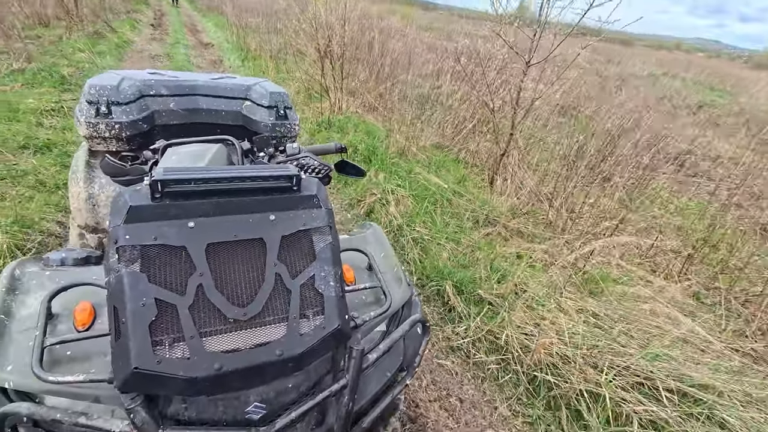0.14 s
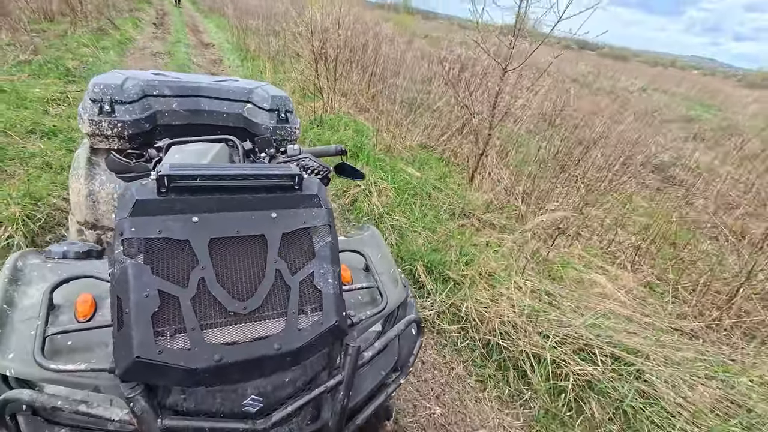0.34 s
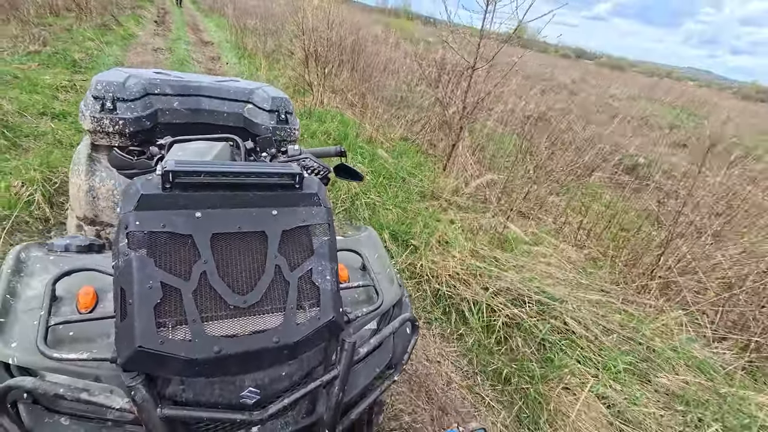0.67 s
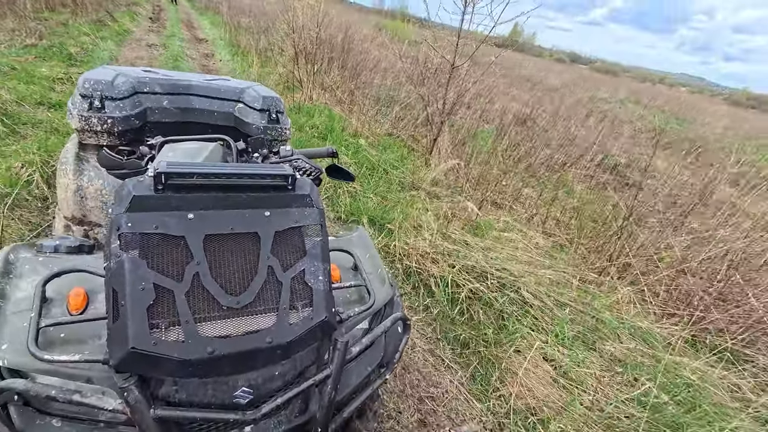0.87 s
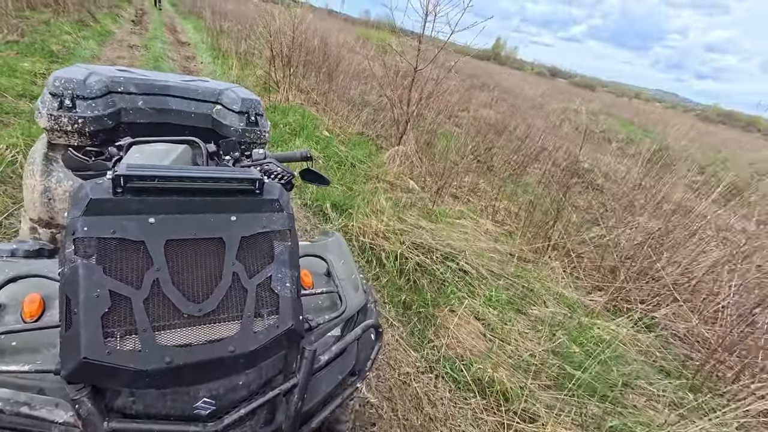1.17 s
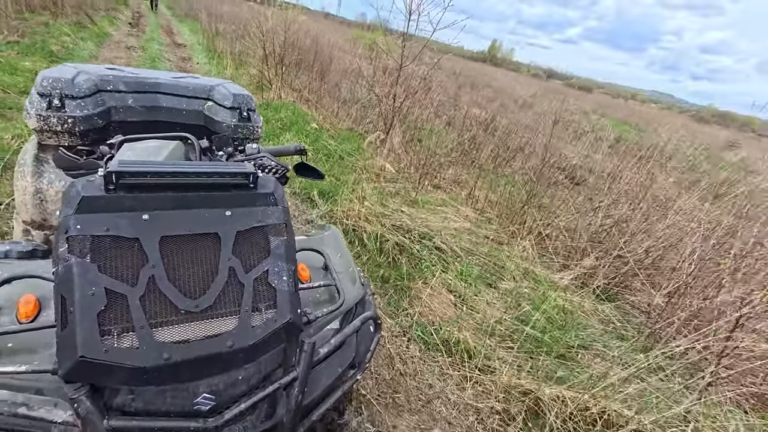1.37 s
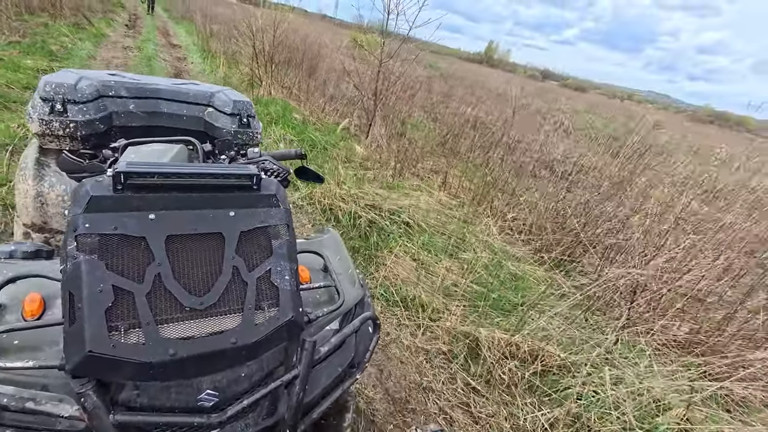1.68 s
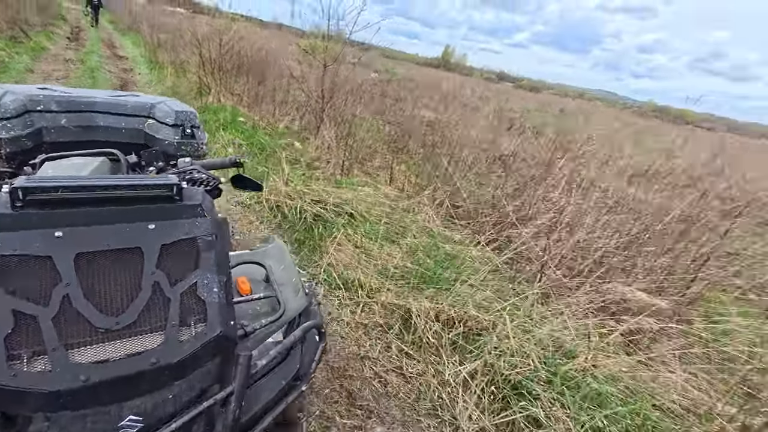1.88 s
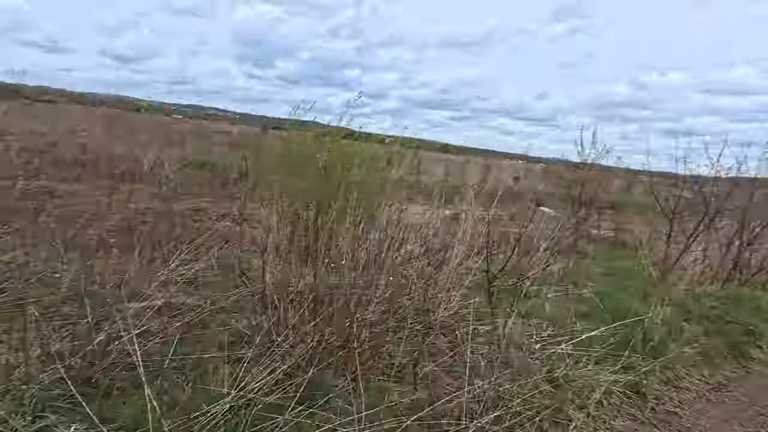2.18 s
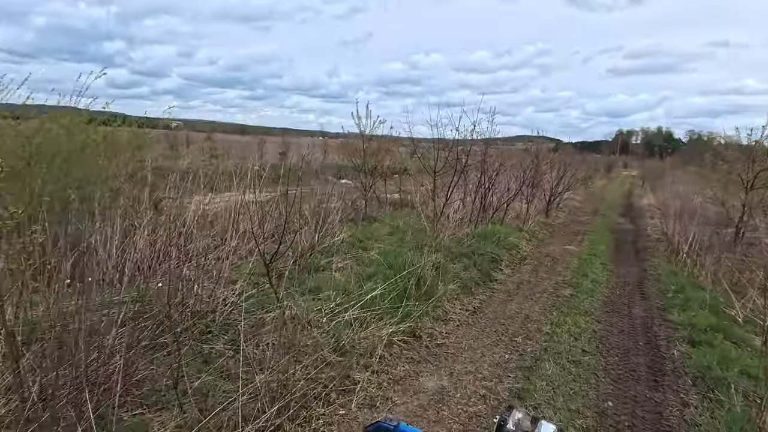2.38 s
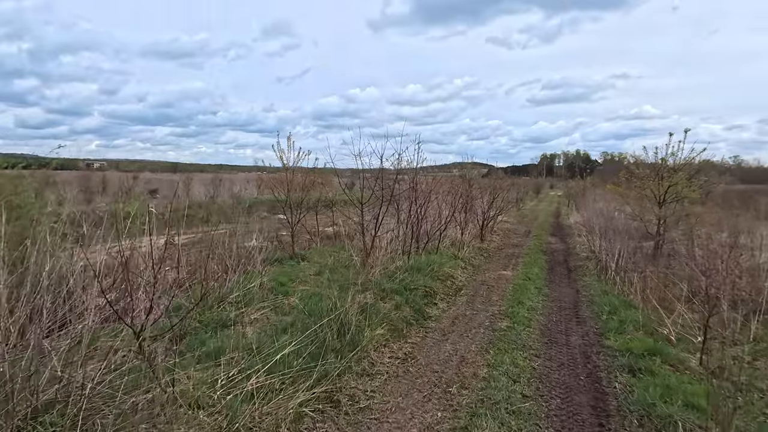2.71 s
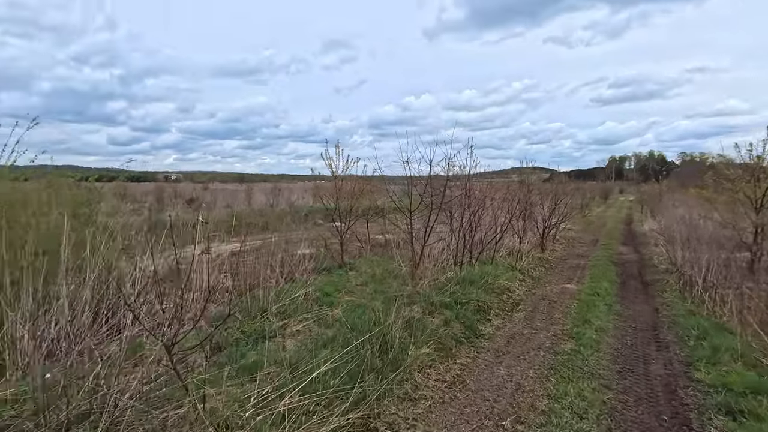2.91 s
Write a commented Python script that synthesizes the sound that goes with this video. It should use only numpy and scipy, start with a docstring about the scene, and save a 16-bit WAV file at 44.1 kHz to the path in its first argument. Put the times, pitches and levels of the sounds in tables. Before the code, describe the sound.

A quad bike engine drones loudly at a nearly steady low speed, with muffled clatter and soft jolts; after two seconds it picks up and turns raspier, with tyre swish. Outdoors, close microphone on the bike.

```python
"""Quad bike on a muddy track, from the saddle

A twin-cylinder quad rolls along at a nearly steady speed. The exhaust drones on orders of the engine cycle;
shaped noise swelling once or more a cycle makes the block's clatter, the intake's rasp and the valves' ticks.
Resonances struck twice a cycle clack. After two seconds the microphone swings round to face ahead, the engine
picks up and its rasp comes forward. Coloured noise gives grassy, gritty tyres, flicks, jolts and light wind."""
import sys
import numpy as np
from scipy import signal
from scipy.fft import rfft, irfft, next_fast_len
from scipy.io import wavfile
from scipy.ndimage import uniform_filter1d, minimum_filter1d

SR = 44100
rng = np.random.default_rng(int(sys.argv[2]) if len(sys.argv) > 2 else 0)


def unload_audio(sound):
    """Save the sound as a 16-bit wav file, at the path given as the first command line argument."""
    columns = np.transpose(np.atleast_2d(sound))
    # keep every value between -1 and 1, then stretch to whole-number steps
    steps = np.round(np.clip(columns, -1, 1) * 32767)
    wavfile.write(sys.argv[1], SR, steps.astype(np.int16))


N = 134505
T = np.arange(N) / SR  # time of every sample [s]

# Intake rasp, coming forward with the swing; the clack follows it: (time [s], level [dB])
INTAKE_LEVEL = [(0, -41), (2.03, -44), (2.13, -33), (2.3, -30.5), (2.65, -28.5), (3.05, -30)]


def from_db(db):
    """Decibels to gain."""
    return 10 ** (np.asarray(db) / 20)


def rms_one(x):
    """Scale to unit power."""
    return x / np.sqrt(np.mean(x ** 2) + 1e-20)


def in_time(rows):
    """Join the points of a control curve with straight lines, at every sample."""
    return np.interp(T, *np.transpose(rows))


def drift(rate_hz):
    """Slow random wandering with spread 1: noise through a double low-pass at the given rate."""
    step = 40  # samples between the points of the slow curve
    r = np.exp(-2 * np.pi * rate_hz * step / SR)
    noise = rng.standard_normal(N // step + 2002)
    slow = signal.lfilter([1], [1, -2 * r, r * r], noise)[2000:]  # the filter has settled by here
    return np.interp(np.arange(N) / step, np.arange(len(slow)), rms_one(slow))


def colour(x, points):
    """Shape a sound by a smooth spectrum, interpolated over log frequency; unit power."""
    hz, db = np.transpose(points)
    size = next_fast_len(N + SR)
    bins_hz = np.maximum(np.arange(size // 2 + 1) * SR / size, 1)
    gain = from_db(np.interp(np.log(bins_hz), np.log(hz), db))
    return rms_one(irfft(rfft(x, size) * gain, size)[:N])


def resonate(x, hz, width_hz):
    """One two-pole resonance with gain of about 1 on top."""
    r = np.exp(-np.pi * width_hz / SR)
    feed = np.array([1, 0, -1]) * (1 - r * r) / 2
    return signal.lfilter(feed, [1, -2 * r * np.cos(2 * np.pi * hz / SR), r * r], x)


def body(x, modes):
    """Parallel resonances, each passed twice for steep sides; unit power."""
    parts = 0
    for hz, width_hz, db in modes:
        once = resonate(x, hz, width_hz)
        parts = parts + from_db(db) * resonate(once, hz, width_hz)
    return rms_one(parts)


def bursts(turn, table, repeat, spread_db):
    """Noise that swells at set places in the cycle, partly alike from one cycle to the next."""
    size = 2048  # points in the noise pattern that every cycle repeats
    repeat = np.clip(repeat, 0, 1)
    pattern = rms_one(irfft(np.exp(2j * np.pi * rng.random(size // 2 + 1))))
    alike = pattern[(turn % 1 * size).astype(int)]
    power = 1  # steady floor under the swells
    for place, width, db in table:
        since = turn - place + .5
        cycle = np.floor(since).astype(int) + 2
        strength = from_db(db + spread_db * rng.standard_normal(128)[cycle])
        power = power + strength ** 2 * np.exp(-.5 * ((since % 1 - .5) / width) ** 2)
    noise = np.sqrt(repeat) * alike + np.sqrt(1 - repeat) * rng.standard_normal(N)
    return np.sqrt(power) * noise


def blend(ahead, behind_db, ahead_db):
    """Gain as the microphone swings round."""
    return (1 - ahead) * from_db(behind_db) + ahead * from_db(ahead_db)


def exhaust(turn, ahead):
    """Orders of the cycle: third to fifth boom together in the silencer, the rest bunch at the firings."""
    # Exhaust lines before and after the swing: (multiple of the cycle rate, relative level [dB])
    behind_db = dict([(2, -17.5), (3, -5), (4, -19.5), (5, 1), (6, -19), (7, -20), (8, -25.5), (9, -22.5),
                      (10, -19.5), (11, -22), (12, -27.5), (13, -27), (14, -19), (15, -28), (16, -41.5),
                      (17, -36.5), (18, -34.5), (19, -33.5), (21, -38), (25, -37.5), (28, -41), (30, -36),
                      (34, -37), (38, -36)])
    ahead_db = dict([(2, -18.5), (3, -4.5), (4, -15.5), (5, 0.7), (6, -26), (7, -18), (8, -39), (9, -20),
                     (10, -25.5), (11, -27.5), (13, -31.5), (15, -27.5), (17, -32.5), (18, -45), (22, -33),
                     (29, -34.5), (33, -40), (36, -38)])
    # Two uneven firings, each followed by its echo in the pipe: (place [cycles], weight [dB])
    firing_places = [(0.24, 1.5), (0.358, 5), (0.719, 0), (0.841, -1.5)]
    exhaust_db = -8  # rms level of a line standing at 0 dB in its list
    boom_waver_db, overtone_waver_db, waver_hz = 0.45, 1.0, 11
    wander_rad = 0.25  # each overtone slips to and fro
    smear_rad, middle_order = 0.07, 12.99  # the pipe spreads each pulse; this order arrives on time
    out = 0
    for k in sorted({*behind_db, *ahead_db}):
        booms = 3 <= k <= 5
        waver = from_db((boom_waver_db if booms else overtone_waver_db) * drift(waver_hz))
        gain = blend(ahead, behind_db.get(k, -np.inf), ahead_db.get(k, -np.inf))
        if booms:
            lead = np.pi
        else:
            firings = sum(from_db(db) * np.exp(-2j * np.pi * k * place) for place, db in firing_places)
            smear = smear_rad * (k - middle_order) ** 2
            lead = np.angle(firings) - smear + wander_rad * drift(waver_hz)
        out = out + gain * waver * np.cos(2 * np.pi * k * turn + lead)
    return np.sqrt(2) * from_db(exhaust_db) * out


def block(turn, ahead):
    """Firings and pistons knock through the block and bodywork: coloured bursts in every cycle."""
    # Knocks within a cycle: (place [cycles], width [cycles], level over the floor [dB])
    knocks = [(0.22, 0.021, 7), (0.37, 0.075, 3), (0.75, 0.13, 3.5), (0.02, 0.021, 0.5)]
    # Spectrum of the clatter: (frequency [Hz], relative level per Hz [dB])
    clatter = [(130, -11.5), (250, -4.5), (320, -5.5), (410, -4), (500, -8.5), (660, -8), (730, -10.5),
               (860, -8), (970, -14.5), (1080, -10.5), (1250, -17), (1380, -14.5), (1520, -11), (1930, -14),
               (2100, -25.5), (2600, -27.5), (3050, -30.5), (4000, -39), (7000, -40.5), (8200, -46.5),
               (10700, -49), (12500, -72), (15000, -79)]
    knocking = bursts(turn, knocks, repeat=.6, spread_db=1.5)
    return blend(ahead, behind_db=-28, ahead_db=-26) * colour(knocking, clatter)


def intake(turn):
    """Gulps of air rasp in the airbox: bursts of noise ring its resonances."""
    # Gulps within a cycle: (place [cycles], width [cycles], level over the floor [dB])
    gulps = [(0.53, 0.06, 3.5), (0.97, 0.043, 6.5), (0.2, 0.041, 2), (.4, 0.021, 3)]
    # Intake resonances: (frequency [Hz], width [Hz], relative level [dB])
    airbox = [(675, 150, -7), (1255, 100, -0.5), (1547, 210, -1.5), (1667, 65, 4.5), (1791, 95, 3),
              (1942, 67, 6), (2120, 160, -6.5), (2890, 3300, -31)]
    gulping = bursts(turn, gulps, repeat=0.62, spread_db=1.0)
    return from_db(in_time(INTAKE_LEVEL)) * body(gulping, airbox)


def clack(turn, ahead):
    """A quick double tap of the engine once a cycle rings two resonances; it comes forward with the rasp."""
    # Taps within a cycle: (place [cycles], relative level [dB])
    tap_places = [(0.542, 2), (.628, -8)]
    # What the taps ring: (frequency [Hz], width [Hz], relative level [dB])
    ring = [(1258, 160, -1.5), (1737, 290, -0.5)]
    clack_db, spread_db = -4, 1.1  # level against the rasp; change from tap to tap
    lag_behind, jitter = 0.14, 0.00086  # later before the swing; unevenness [cycles]
    taps = 0
    for place, db in tap_places:
        phase = turn - place - lag_behind * (1 - ahead) + jitter * drift(20)
        struck = np.diff(np.floor(phase), prepend=np.nan) > 0
        taps = taps + struck * from_db(db + spread_db * rng.standard_normal(N))
    return from_db(in_time(INTAKE_LEVEL) + clack_db) * body(taps + 1e-18, ring)


def valves(turn):
    """Valve gear chatters with a thin metallic ring that slides down in the swing, then a broader one takes over."""
    # Ticks within a cycle, before and after: (place [cycles], width [cycles], level over the floor [dB])
    ticks_behind = [(.07, 0.018, 9), (.17, 0.035, 8.5), (0.71, 0.04, 7.5), (.83, .02, 6.5)]
    ticks_ahead = [(.08, .035, 8), (.655, 0.033, 11), (.76, .05, 6), (.98, .02, 3.4)]
    # Ring before the slide, and the broader ring: (frequency [Hz], width [Hz], relative level [dB])
    ring_behind = [(5170, 200, -11), (5524, 570, -2), (5640, 87, -7), (6500, 900, -13.5)]
    ring_ahead = [(5030, 470, 4.5), (5510, 490, 8), (5980, 550, 3), (6670, 750, -4.5)]
    # Valve chatter: (time [s], level [dB])
    chatter_level = [(0, -55), (1.2, -53.5), (1.6, -51.5), (2.1, -51.5), (2.4, -52.5), (2.6, -46),
                     (2.88, -48), (3.05, -57)]
    slide_s, slide_length_s, drop_hz = 2.0, 0.13, 363
    repeat, spread_db = 0.28, 1.2
    progress = (T - slide_s) / slide_length_s
    slide = np.clip(progress, 0, 1)
    broad = np.clip(progress - 1, 0, 1)
    thin = body(bursts(turn, ticks_behind, repeat, spread_db), ring_behind)
    # shift every frequency down by the same number of Hz
    thin = np.real(signal.hilbert(thin) * np.exp(-2j * np.pi * drop_hz * np.cumsum(slide) / SR))
    front = body(bursts(turn, ticks_ahead, repeat, spread_db), ring_ahead)
    return from_db(in_time(chatter_level)) * (np.sqrt(1 - broad) * thin + np.sqrt(broad) * front)


def tyres():
    """Swish of grass as coloured noise, with grains of grit as random clicks."""
    # Tyres in grass and grit: (time [s], level [dB])
    tyre_level = [(0, -59), (1.3, -55.5), (2.05, -52.5), (2.36, -44.5), (2.66, -47.5), (3.05, -51)]
    # Spectrum of the swish: (frequency [Hz], relative level per Hz [dB])
    swish = [(1500, -11.5), (3100, 10), (4000, -4.5), (5000, -4.5), (6700, -7.5), (8100, -16.5),
             (9500, -10), (11200, -14.5), (12300, -29.5), (15500, -37.5)]
    grit_per_s, grit_spread_db = 360, 3.5
    grit_share = np.clip(0.35, 0, 1)  # share of the power
    flutter_db, flutter_hz = 1.3, 16  # tufts brush past unevenly
    falls = rng.random(N) < grit_per_s / SR
    size_db = grit_spread_db * np.minimum(rng.exponential(1, N), 2)
    grit = falls * rng.choice([-1, 1], N) * from_db(size_db)
    mix = np.sqrt(grit_share) * rms_one(grit) + np.sqrt(1 - grit_share) * rng.standard_normal(N)
    level_db = in_time(tyre_level) + flutter_db * drift(flutter_hz)
    return from_db(level_db) * colour(mix, swish)


def wind():
    """Low buffeting on the microphone: coloured noise."""
    # Wind on the microphone: (time [s], level [dB])
    wind_level = [(0, -16.5), (1.1, -20.5), (1.5, -21), (1.8, -19.5), (2.7, -17), (2.95, -12.5),
                  (3.05, -18)]
    # Spectrum of the buffeting: (frequency [Hz], relative level per Hz [dB])
    buffeting = [(15, -30.5), (33, -15.5), (55, -2), (85, 7), (125, 0.5), (170, -14), (400, -19),
                 (900, -70)]
    return from_db(in_time(wind_level)) * colour(rng.standard_normal(N), buffeting)


def swell(s, length_s, db, hz, width_hz):
    """A soft bell-shaped puff of noise in one resonance; length_s is the bell's standard deviation."""
    shape = np.exp(-.5 * ((T - s) / length_s) ** 2)
    puff = shape * body(rng.standard_normal(N), [(hz, width_hz, 0)])
    return from_db(db) * np.sqrt(np.mean(shape ** 2)) * rms_one(puff)


def jolts():
    """Soft low thuds as ruts jolt the bike: short puffs of low noise."""
    # Jolts: (time [s], level [dB], thud [Hz])
    ruts = [(0.098, -15, 85), (0.188, -18.5, 70), (.54, -24, 85), (1.482, -11.5, 80), (1.558, -12, 75),
            (1.656, -16, 90), (2.026, -12.5, 160), (2.941, -12.5, 85)]
    return sum(swell(s, 0.0058, db, hz, width_hz=89) for s, db, hz in ruts)


def flicks():
    """Stalks and stones flick against the bike: short bright scuffs of resonant noise that die at once."""
    # Flicks: (time [s], level [dB], ring [Hz], width [Hz])
    scuffs = [(0.95, -43, 4200, 2180), (1.487, -43, 5000, 3500), (1.574, -44, 4700, 3000),
              (2.156, -50, 5550, 1200), (2.35, -38.5, 4300, 700), (2.368, -47, 5000, 700),
              (2.452, -50, 6500, 5000), (2.598, -43, 4200, 2500), (2.66, -37, 4200, 3500),
              (2.787, -50, 6000, 4000), (2.867, -44, 5500, 5070)]
    rise_s, decay_s = .002, 0.0076
    out = 0
    for s, db, hz, width_hz in scuffs:
        rise = np.clip((T - s) / rise_s, 0, 1)
        decay = np.exp(-np.abs(T - s - rise_s) / decay_s)
        out = out + from_db(db) * rise * decay * body(rng.standard_normal(N), [(hz, width_hz, 0)])
    return out


def rustle():
    """A dull rustle as the microphone swings: one longer puff of noise."""
    return swell(2.06, length_s=0.11, db=-29, hz=457, width_hz=410)


def scene():
    """One crankshaft drives all the engine layers; tyres, jolts and wind lie underneath."""
    # Engine speed: (time [s], four-stroke cycles per second [Hz])
    speed = [(0.0, 23.355), (0.25, 23.011), (0.55, 22.556), (1.0, 22.385), (1.4, 22.164), (1.85, 22.214),
             (2.1, 22.802), (2.35, 23.617), (2.7, 23.921), (3.05, 24.376)]
    start_turn = .103  # place in the engine cycle at the start [cycles]
    jitter_cycles, jitter_hz = .003, 12  # the crank runs slightly unevenly
    swing_s, swing_length_s = 2.076, 0.28  # middle and length of the microphone's swing
    turn = start_turn + np.cumsum(in_time(speed)) / SR + jitter_cycles * drift(jitter_hz)
    ahead = np.clip((T - swing_s) / swing_length_s + .5, 0, 1)  # 0 before the swing, 1 after
    engine = exhaust(turn, ahead) + block(turn, ahead) + intake(turn) + clack(turn, ahead) + valves(turn)
    return (engine + tyres() + wind() + jolts() + flicks() + rustle())[None]


def record(dry):
    """The deepest rumble is cut, a fast limiter holds the peaks down, the top is cut."""
    low_cut_hz, top_cut_hz = 12, 15700
    ceiling, limiter_s = .84, 0.032
    low_cut = signal.butter(1, low_cut_hz, "high", fs=SR, output="sos")
    dry = signal.sosfiltfilt(low_cut, dry, padtype="even", padlen=SR // 10)
    size = max(int(limiter_s * SR), 1)
    needed = ceiling / np.maximum(np.abs(dry), ceiling)
    gain = uniform_filter1d(minimum_filter1d(needed, size), size)
    top_cut = signal.cheby2(12, 70, top_cut_hz, fs=SR, output="sos")
    return signal.sosfiltfilt(top_cut, dry * gain)


dry = scene()
out = record(dry)
unload_audio(out)
```